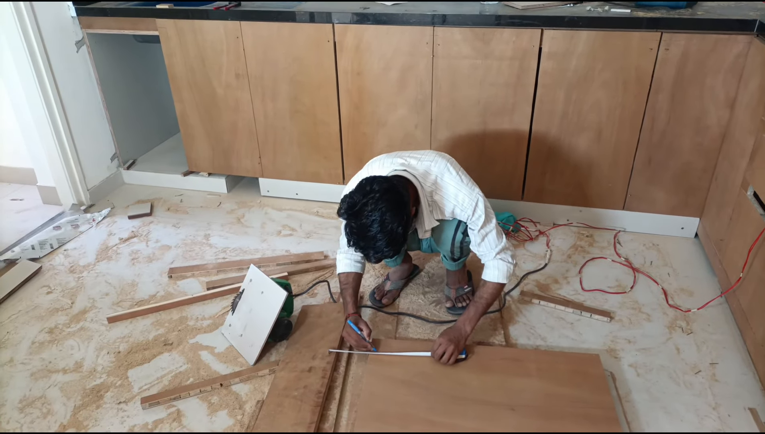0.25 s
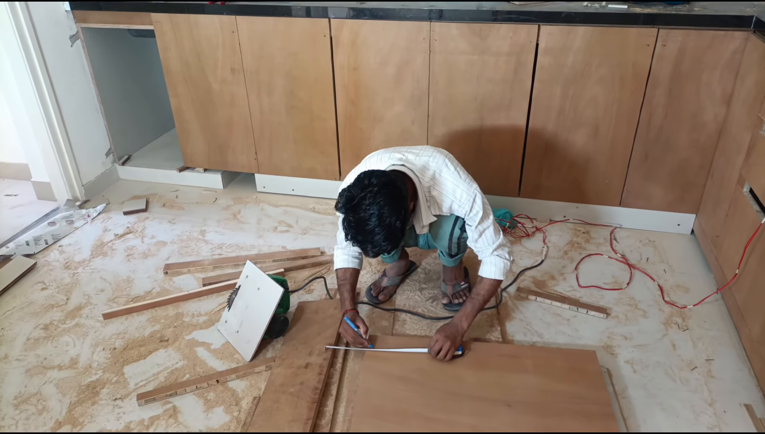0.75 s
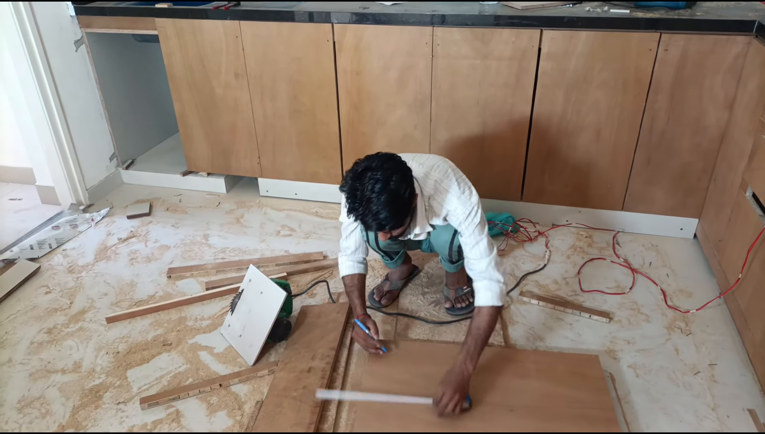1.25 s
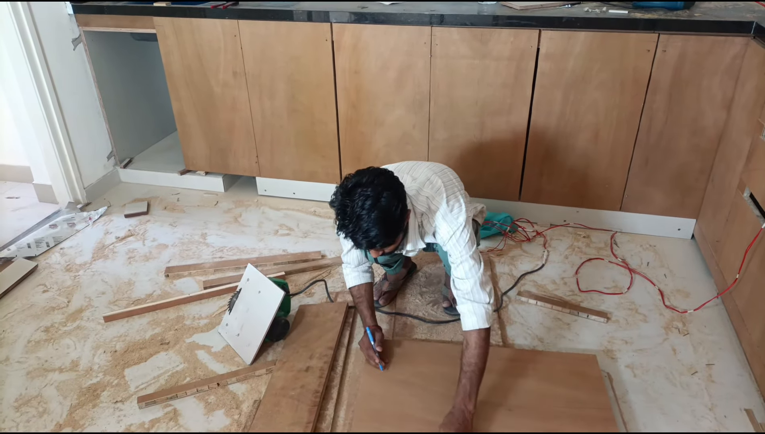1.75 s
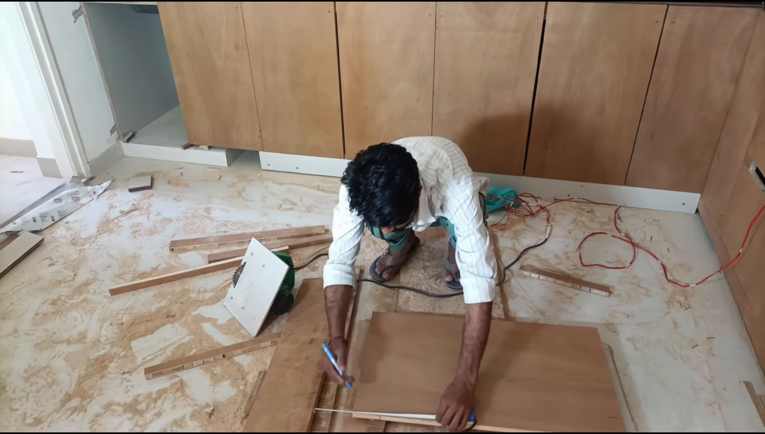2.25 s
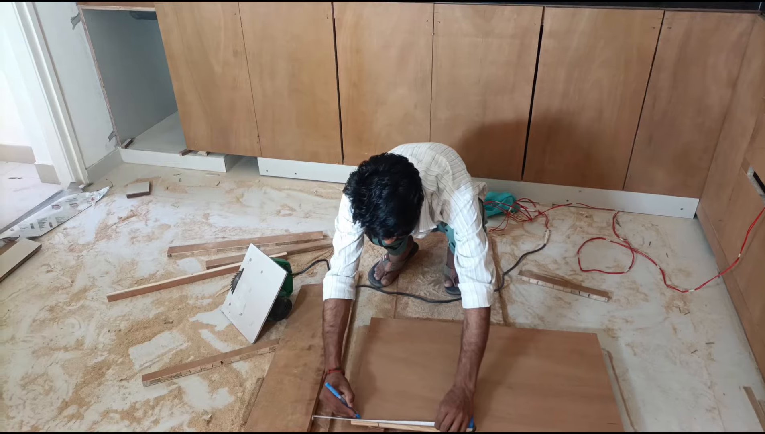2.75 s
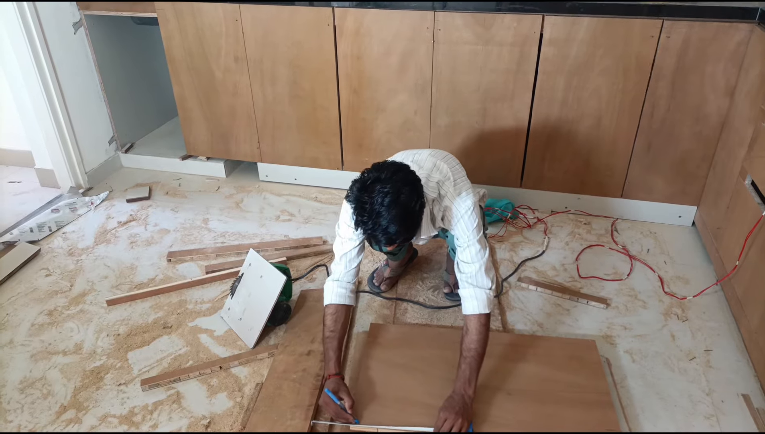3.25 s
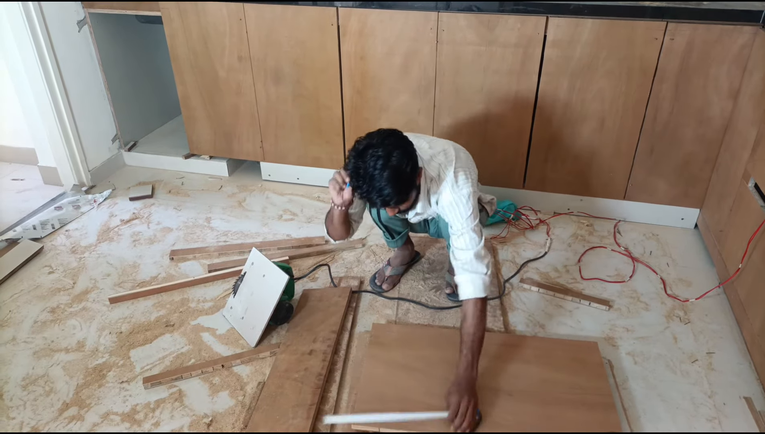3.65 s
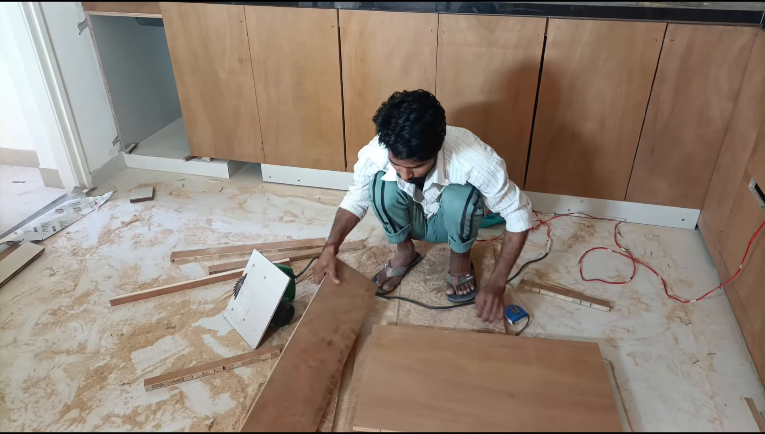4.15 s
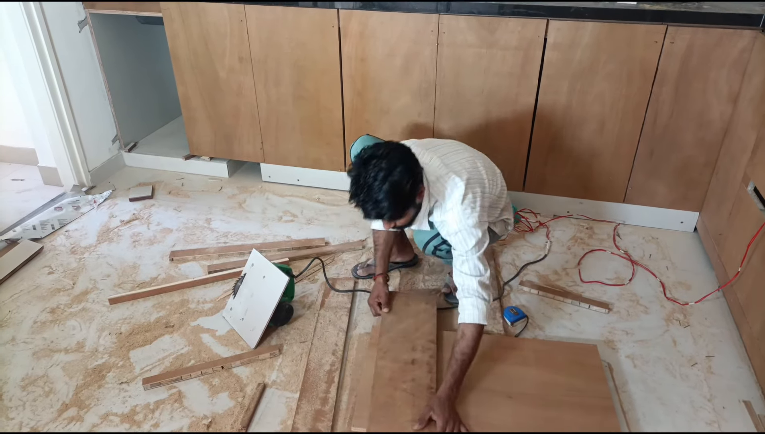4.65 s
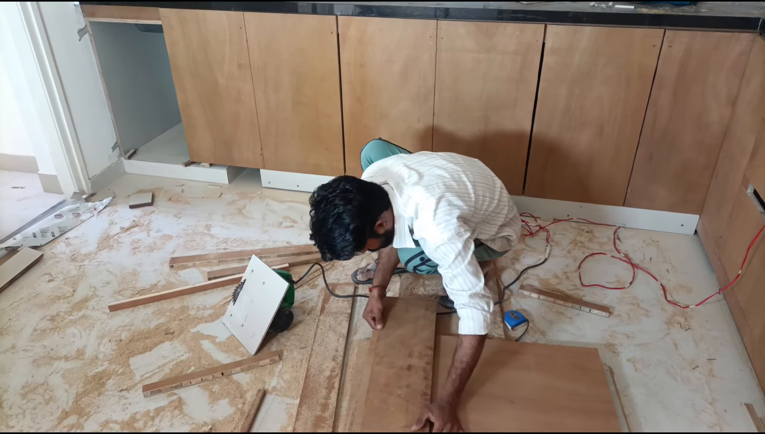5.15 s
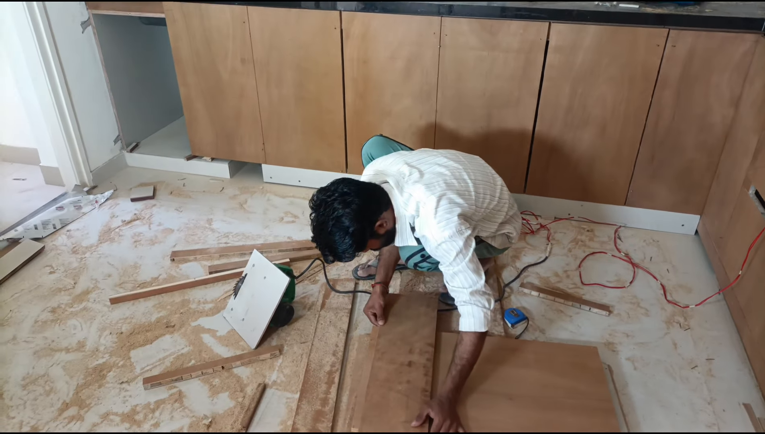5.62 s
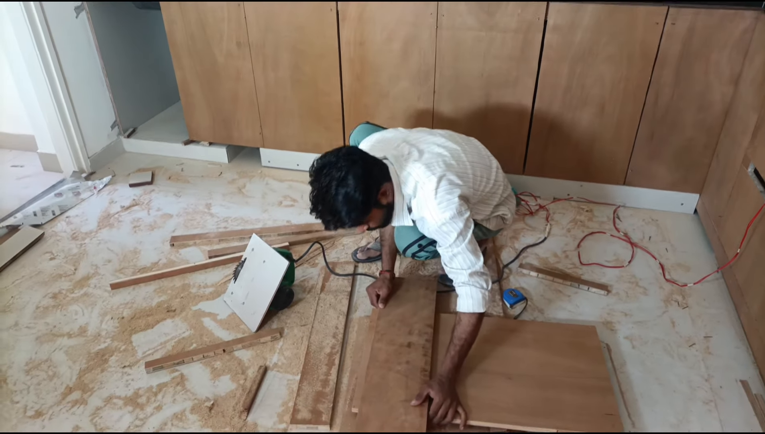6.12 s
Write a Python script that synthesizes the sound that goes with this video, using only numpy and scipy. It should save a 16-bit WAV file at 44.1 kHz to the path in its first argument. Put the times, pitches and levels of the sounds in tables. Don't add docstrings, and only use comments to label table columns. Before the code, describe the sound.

A steel tape measure clacks and slides on a board, snaps sharply, then wooden planks knock and one drops flat in a bare, ringing room.

```python
import sys
import numpy as np
from scipy import signal
from scipy.fft import rfft, irfft
from scipy.io import wavfile
from scipy.ndimage import uniform_filter1d

SR = 44100
rng = np.random.default_rng(int(sys.argv[2]) if len(sys.argv) > 2 else 0)


def voltage_ratio(level):
    return 10 ** (np.asarray(level, float) / 20)


def log_audio(samples):
    frames = np.atleast_2d(samples).T
    limited = np.clip(frames, -1, 1)
    pcm = np.round(limited * 32767).astype(np.int16)
    wavfile.write(sys.argv[1], SR, pcm)


N = 281354

# (f/Hz, level/dB, t60/s)
BLADE = [
    [(2150, -9, .008), (2430, 0, .016), (2700, -1, .011), (3120, -3, .009), (3700, -8, .005),
     (4200, -10, .004)],
    [(410, -4, .025), (510, 0, .03), (1080, -3, .012), (1350, -4, .008), (1700, -5, .008)],
    [(4700, -4, .004), (5400, -3, .004), (6000, 0, .005), (6650, 0, .005), (7200, -6, .004)],
    [(8600, -5, .0009), (9600, -4, .0009), (10500, -1, .0012), (11600, -4, .0009), (12700, -3, .0009),
     (13800, -2, .0009), (14800, -2, .0009)],
]
# (f/Hz, level/dB, t60/s)
PLANK = [
    [(292, -15, .03), (320, -16, .03), (352, -4, .08), (396, -1, .06), (435, 1, .06), (495, -2, .05),
     (590, -7, .025), (690, -8, .02)],
    [(810, -3, .02), (975, -2, .016), (1125, -1, .016), (1335, -4, .011), (1600, -4, .009)],
    [(1850, -1, .01), (2150, -1, .008), (2450, 0, .01), (2750, -4, .007), (3150, -7, .004),
     (3600, -10, .003)],
    [(3600, 0, .004), (4200, -2, .004), (4900, -4, .004), (5700, -6, .004), (6500, -7, .004)],
]
# (f/Hz, likeness 0..1)
AIR_ALIKE = [(60, 0.38), (180, 1), (550, 0.26), (1650, 0.11), (4970, 0.4), (15000, 0.65)]


def evened(x):
    return x / np.sqrt(np.mean(x ** 2) + 1e-20)


def read(points, hz):
    f, value = np.transpose(points)
    return np.interp(np.log(hz + 1), np.log(f + 1), value)


def along(rows):
    s, value = np.transpose(rows)
    return np.interp(np.arange(N) / SR, s, value)


def smooth(x, size):
    return evened(uniform_filter1d(uniform_filter1d(x, size), size))


def resonate(x, hz, width):
    r = np.exp(-np.pi * width / SR)
    return 2 * signal.lfilter([1 - r], [1, -r * np.exp(2j * np.pi * hz / SR)], x).real


def band(lo_hz, hi_hz):
    return signal.butter(2, [lo_hz, min(hi_hz, 20000)], "band", fs=SR, output="sos")


def causal(power):
    fold = irfft(np.log(power + 1e-6 * power.max()) / 2)
    fold[1:len(power) - 1] *= 2
    fold[len(power):] = 0
    return irfft(np.exp(rfft(fold)))


def pair(count, alike, gain_db):
    hz = np.fft.rfftfreq(1024, 1 / SR)[:, None]
    t = np.arange(count // 256 + 5) * 256 / SR
    a, b, c, d = rng.standard_normal((len(t), 513, 4)).T
    same = np.clip(read(alike, hz), -1, 1)
    left = a + 1j * b
    right = same * left + np.sqrt(1 - same ** 2) * (c + 1j * d)
    z = np.array([left, right]) * voltage_ratio(gain_db(hz, t))
    return signal.istft(z, nperseg=1024, noverlap=768)[1][:, :count]


def lean(x, ports):
    half_db = read(ports, np.fft.rfftfreq(x.shape[1], 1 / SR)) / 2
    return irfft(rfft(x) * voltage_ratio(np.array([half_db, -half_db])), x.shape[1])


def contacts(rows, slope, offset_db, length=None):
    events = []
    for s, db, low_db, bright_db, *own in rows:
        top_db = slope * bright_db + offset_db
        events.append((s, db, low_db, bright_db, top_db, (*own, length)[0]))
    return events


def struck(events, body, lead_db, grit_db, spread, rise):
    swing_in_s = 0.00069
    crack_db, skirt_db = -15, -15
    out, t = np.zeros((2, N + SR)), np.arange(12288) / SR
    filters = []
    for modes in body:
        lo, hi = .7 * modes[0][0], 1.25 * modes[-1][0]
        filters.append((band(lo, hi), band(lo / 1.6, hi * 1.5), SR / (2 * (hi - lo))))
    for s, db, *relative_db, length in events:
        length = max(length, .0005)
        clicks = rng.standard_normal(len(t)) * voltage_ratio(grit_db * rng.exponential(1, len(t)))
        clicks *= (1 - np.exp(-t / (rise * length))) * np.exp(-t / length)
        clicks[round(.3 * length * SR)] += voltage_ratio(lead_db)
        clicks = clicks[:round(8 * length * SR)]
        detune = (1 + spread * rng.standard_normal(8)) * (-1) ** np.arange(8)
        power = 0
        for modes, rel_db, (inside, around, size) in zip(body, [0, *relative_db], filters):
            u = t[:round(SR * max(t60 for *_, t60 in modes)) + 256]
            ring = 0
            for (hz, mode_db, t60), k in zip(modes, detune):
                ring = ring + voltage_ratio(mode_db - 60 * u / t60) * np.sin(2 * np.pi * hz * k * u)
            ring *= 1 - np.exp(-u / swing_in_s)
            blow = size * (u == 0)
            ring = signal.sosfilt(inside, ring + voltage_ratio(crack_db) * blow)
            ring += voltage_ratio(skirt_db) * signal.sosfilt(around, blow)
            sound = signal.fftconvolve(clicks, ring)
            sound *= voltage_ratio(db + rel_db) / abs(sound).max()
            out[0, round(s * SR):][:len(sound)] += sound
            power = power + abs(rfft(ring, 16384)) ** 2 * (sound @ sound) / (ring @ ring)
        blend = causal(power)[:8192]
        if length > .007:
            blend = signal.fftconvolve(blend, clicks / np.linalg.norm(clicks))
        out[1, round((s + .001) * SR):][:len(blend)] += blend
    return out[:, :N]


def room(x):
    # (f/Hz, t60/s)
    ring_times = [(100, 0.95), (230, 0.45), (300, 0.45), (355, 0.79), (410, 0.62), (480, 0.56),
                  (1000, 0.61), (2700, 0.54), (6000, 0.52), (9000, .38), (15000, 0.36)]
    # (f/Hz, likeness 0..1)
    tail_alike = [(60, .95), (400, .97), (700, .4), (1300, 0), (5000, 0)]
    gap_s, turns_hz = 0.0024, 11
    t, out = np.arange(SR) / SR, 0
    turn = 2 * np.pi * turns_hz * np.arange(N) / SR
    for share in (np.cos(turn), np.sin(turn)):
        tail = pair(SR, tail_alike, lambda hz, u: -60 * u / read(ring_times, hz))
        tail *= np.clip((t - gap_s) / 0.0021, 0, 1)
        tail *= 1 + 0.68 * np.exp(-t / 0.019)
        out = out + signal.fftconvolve(share * x[None], tail / np.linalg.norm(tail[0]), axes=1)[:, :N]
    return out


def still_air():
    # (f/Hz, level/dB per Hz)
    air_colour = [(15, -22), (25, -6), (165, -10.5), (194, -11), (333, -16.5), (461, -17), (587, -30),
                  (654, -26.5), (812, -25), (955, -23.5), (1430, -30.5), (2660, -31), (7220, -47),
                  (11100, -39.5), (15800, -36.5)]
    return voltage_ratio(-65) * evened(pair(N, AIR_ALIKE, lambda hz, t: read(air_colour, hz)))


def rumble():
    # (t/s, level/dB above rest, fade/s)
    swells = [(1.35, 11.5, 0.33), (1.75, 0, 0.15), (3.58, 10, 0.11), (4.6, 15, .05), (4.7, 18.5, 0.13),
              (5.76, 13.5, 0.08), (6.0, 3.5, 0.34)]
    level_db, wander_db, rise_s = -67.5, -2.5, 0.077

    def colour(hz, u):
        return -24 * np.log10(1 + (hz / 80) ** 2) - 10 * np.log10(1 + (40 / (hz + 1)) ** 2)

    t = np.arange(N) / SR
    drone = evened(pair(N, [(30, 1.0), (200, 0.73)], colour))
    wander = evened(uniform_filter1d(rng.standard_normal(N), 4000))
    swell = 1
    for s, db, fade in swells:
        swell = swell + (voltage_ratio(db) - 1) * np.exp(-((t - s) / np.where(t < s, rise_s, fade)) ** 2)
    return voltage_ratio(level_db + wander_db * wander) * swell * drone


def machine():
    # (t/s, level/dB)
    machine_level = [(0, -73), (.2, -62), (.45, -71), (.8, -77.5), (1.9, -71), (2.3, -67.5), (2.5, -76),
                     (3.2, -78.5), (3.5, -64), (5.0, -64), (5.3, -62.5), (5.9, -61.5), (6.38, -63.5)]
    # (f/Hz, level/dB per Hz)
    hiss_colour = [(290, -38.5), (500, -5.5), (754, -17), (915, -13.5), (2130, -11), (2560, -9.5),
                   (4250, -15), (4680, -15), (6190, -7.5), (9000, -43.5), (11700, -73), (19800, -120)]
    # (f/Hz, width/Hz, level/dB, flutter/dB)
    whines = [(2600, 70, -7, 3), (3860, 35, -11.5, 5), (4500, 35, -11, 4), (4780, 40, -13, 4.5),
              (5250, 60, -20, 5), (6150, 120, -12, 5)]
    mix = evened(pair(N, AIR_ALIKE, lambda hz, t: read(hiss_colour, hz)))
    chirps = smooth(rng.standard_normal(N), 1500)
    for hz, width, db, flutter_db in whines:
        own, drift = (smooth(v, 1200) for v in rng.standard_normal((2, N)))
        turn = np.exp(2j * np.pi * np.cumsum(hz * (1 + .007 * drift)) / SR)
        r = np.exp(-np.pi * width / SR)
        whine = (turn * signal.lfilter([1 - r], [1, -r], rng.standard_normal((2, N)))).real
        flutter = np.clip(.6 * chirps + .8 * own, -2, 1.6)
        mix = mix + voltage_ratio(db + flutter_db * flutter) * evened(whine)
    return voltage_ratio(along(machine_level)) * mix


def backdrop():
    # (f/Hz, level/dB)
    air_ports = [(60, -2), (180, 1.5), (550, -1.5), (1650, 3.5), (4970, 12.5), (15000, 3)]
    return lean(still_air() + machine(), air_ports) + rumble()


def squeak():
    # (f/Hz, width/Hz, level/dB)
    squeak_modes = [(3560, 82, 1), (4000, 140, 1), (5200, 90, -5), (5780, 52, -10), (6330, 51, -25.5)]
    start_s, length_s, level_db = 3.01, .15, -67
    t = np.arange(N) / SR
    shape = np.clip(np.minimum((t - start_s) / 0.0077, (start_s + length_s - t) / 0.049), 0, 1)
    noise = rng.standard_normal(N)
    song = sum(voltage_ratio(m) * evened(resonate(noise, hz, w)) for hz, w, m in squeak_modes)
    return voltage_ratio(level_db) * shape * evened(song)


def floor_thuds():
    # (t/s, level/dB, contact length/s)
    presses = [(1.379, -52, 0.03), (2.184, -67, 0.008), (3.599, -60, 0.025), (4.155, -51, 0.073),
               (4.603, -41.5, 0.02), (4.693, -40, 0.0034), (5.545, -46, 0.018), (5.581, -50.5, 0.013),
               (5.625, -52, 0.016), (5.707, -59, 0.012), (6.327, -55.5, 0.024)]
    # (f/Hz, level/dB, t60/s)
    floorboard = [
        [(132, -11.5, 0.1), (213, -5, 0.26), (258, 4.5, 0.085), (363, -1.5, 0.15)],
    ]
    return struck(presses, floorboard, lead_db=-30, grit_db=1.5, spread=.04, rise=.6)


def pen_squeaks():
    # (t/s, level/dB, contact length/s)
    strokes = [
        (.045, -53, 0.0087),
        (.216, -49, .006),
        (.575, -66, .005),
    ]
    # (f/Hz, level/dB, t60/s)
    nib = [
        [(5770, 1, 0.011), (6080, 12, 0.014), (6200, -11, 0.009)],
    ]
    return struck(strokes, nib, lead_db=-10, grit_db=1.5, spread=.01, rise=.5)


def hook_taps():
    # (t/s, ring level/dB, low thud/dB rel, brightness/dB rel)
    tap_rows = [(0.839, -47.5, -3.5, -9), (0.8965, -50.5, -9, -30), (0.9445, -34.5, -12.5, -33),
                (0.9495, -47, -36, 9.5), (1.0294, -60.5, 10, -31), (1.0402, -38, -12.5, 3.5),
                (1.084, -52, 1.5, -31), (2.2, -58.5, -5.5, 11), (2.5294, -67.5, -4, -14),
                (3.2824, -70, 7.5, -4.5), (3.3731, -55, -3, -18), (3.455, -46.5, -9, -20),
                (3.4664, -54.5, 0, -20)]
    # (f/Hz, level/dB, t60/s)
    hook = [
        [(1716, -5.5, 0.027), (1910, -5.5, 0.02), (2406, 0, 0.017), (2820, -8.5, 0.0065), (3170, -10.5, 0.013)],
        [(400, -1.5, 0.037), (499, 2, 0.049), (1056, -6.5, 0.064), (1240, -5.5, 0.09)],
        [(5300, -14, 0.0043), (5975, 0, 0.0077), (6400, -1, 0.0077), (6650, 2.5, 0.012), (7080, -8, 0.0055)],
        BLADE[-1],
    ]
    events = contacts(tap_rows, slope=0.42, offset_db=-6, length=0.0017)
    return struck(events, hook, lead_db=5, grit_db=2.0, spread=0.012, rise=0.5)


def blade_slides():
    # (t/s, blade ring/dB, panel thud/dB rel, brightness/dB rel, stroke length/s)
    slide_rows = [(0.0464, -79, 13, -3, 0.02), (0.2082, -69, 16.5, -3, 0.0077),
                  (0.5764, -64.5, -17.5, -3, 0.043), (1.177, -44, -24, 5.5, 0.017),
                  (1.21, -38, -2.5, 1.5, 0.016), (1.24, -51.5, -16.5, -13, 0.011), (3.43, -50, 4, 1, 0.012),
                  (3.565, -46, -51, -2.5, 0.049), (3.6985, -34.5, -10.5, -6.5, 0.011),
                  (3.853, -44.5, -35.5, 7.5, 0.021), (3.908, -26.5, -37.5, 6, 0.0078),
                  (3.928, -40.5, -39.5, 4, 0.13), (3.942, -33, -32.5, 5.5, 0.012),
                  (4.3782, -34.5, -12.5, -1.5, 0.014), (4.5093, -42.5, -4.5, 3.5, 0.0095),
                  (4.5399, -38, -5.5, 2, 0.026), (4.79, -55, -19, 6, 0.04), (6.3507, -62, 14, 5.5, 0.045)]
    # (f/Hz, level/dB, t60/s)
    rubbed = [
        [(2100, -9.5, 0.0031), (2260, 0, 0.006), (2980, -0.5, 0.0025), (3550, -13, 0.017),
         (3997, -10.5, 0.0083)],
        [(385, -3.5, 0.037), (480, -1.5, 0.02), (1050, -2, 0.03), (1300, 10, 0.0056), (1720, -5.5, 0.004)],
        *BLADE[-2:],
    ]
    events = contacts(slide_rows, slope=3.9, offset_db=-9.5)
    return struck(events, rubbed, lead_db=-30.0, grit_db=3.5, spread=0.037, rise=0.8)


def blade_clacks():
    # (t/s, blade ring/dB, panel thud/dB rel, brightness/dB rel)
    clack_rows = [(1.182, -47.5, -25, 11.5), (1.3405, -48, -31.5, 16.5), (1.6015, -30, -3.5, 10.5),
                  (1.608, -35.5, -5.5, 12), (3.663, -45.5, -34, 15), (3.6805, -36, -12.5, 16),
                  (3.7952, -36.5, -1, 12), (3.8714, -48.5, -4.5, 4), (3.925, -18, -38, 6),
                  (3.947, -38.5, -19, -6), (4.039, -11.5, -29.5, 2), (4.045, -32, -18, -15),
                  (4.1598, -5.5, -31.5, -4.5), (4.1712, -18, -15, -12.5), (4.181, -18, -15.5, -12.5),
                  (4.617, -25.5, 13.5, 0.5)]
    events = contacts(clack_rows, slope=1.23, offset_db=-0.57, length=0.0041)
    return struck(events, BLADE, lead_db=10, grit_db=2.0, spread=0.022, rise=0.81)


def case_snaps():
    # (t/s, ring level/dB, low thud/dB rel, brightness/dB rel)
    snap_rows = [
        (1.4285, -3.5, -8, -9.5),
        (1.4495, -11.5, -6.5, -11),
        (1.462, -30.5, 3.5, -11.5),
        (1.476, -38.5, 6.5, -24),
    ]
    # (f/Hz, level/dB, t60/s)
    case = [
        [(1800, -7.5, 0.011), (2350, -5, 0.016), (3050, -7.5, 0.005), (3274, -9.5, 0.0087),
         (3710, -10.5, 0.0083), (4000, -12, 0.00297)],
        [(385, -20.5, 0.018), (435, 9.5, 0.036), (861, 1, 0.022), (1130, 20.5, 0.025), (1350, -10, 0.0074)],
        [(4360, 1.5, .003), (5000, -4.5, 0.0049), (5900, -3, 0.0028), (6410, -0.5, 0.0087),
         (7000, -9.5, 0.0053)],
        BLADE[-1],
    ]
    events = contacts(snap_rows, slope=1, offset_db=0.94, length=0.0036)
    return struck(events, case, lead_db=10, grit_db=0.5, spread=.005, rise=0.5)


def board_knocks():
    # (t/s, boom/dB, knock/dB rel, brightness/dB rel)
    knock_rows = [(0.147, -53, -9, -2), (0.236, -45.5, -27, -13), (0.732, -61.5, -16.5, -2),
                  (1.254, -54.5, -3.5, 15.5), (3.457, -67, 2, -19), (3.665, -59, 13, 24.5),
                  (3.715, -57, 18, 26), (3.761, -51, 9.5, 18), (3.808, -45.5, 5, -7),
                  (3.976, -41.5, -7.5, 6), (4.105, -25, 7.5, 7), (4.117, -29.5, 0, 1.5),
                  (4.145, -28, 13, 6.5), (4.157, -19, 1.5, 11.5), (4.176, -45, 6, 14), (5.890, -55, 9, 1),
                  (5.897, -42, -7, -12), (5.921, -39, -34, -8), (6.283, -72, -22, -15)]
    # (f/Hz, level/dB, t60/s)
    strip = [
        [(423, -11, 0.012), (440, -4, 0.03), (513, 1, 0.031), (634, -5.5, 0.0088)],
        *PLANK[-3:],
    ]
    events = contacts(knock_rows, slope=0.93, offset_db=-0.39, length=0.0053)
    return struck(events, strip, lead_db=7.0, grit_db=-2.0, spread=0.0056, rise=0.7)


def board_drop():
    # (t/s, boom/dB, knock/dB rel, brightness/dB rel)
    slap_rows = [(4.605, -5, -3, -6), (4.612, -12.5, 1.5, 1), (4.618, -12, 5, 8.5), (4.624, -12, 1.5, -7.5),
                 (4.640, -16.5, 1.5, -9.5), (4.654, -7, -6, -12.5), (4.679, -11, -3, -7),
                 (4.6815, -14.5, 6, 3), (4.690, -15.5, 4.5, 9), (4.697, -10.5, 3.5, -10),
                 (4.709, -27, -5, -9), (4.749, -35, -2.5, -36)]
    events = contacts(slap_rows, slope=0.8, offset_db=-20, length=0.0033)
    return struck(events, PLANK, lead_db=13.5, grit_db=2.5, spread=0.03, rise=0.43)


def scene():
    # (f/Hz, level/dB)
    near_ports = [(60, -8), (130, 0.5), (290, 1), (640, -1.5), (1410, 1.5), (3100, 8), (6500, 11),
                  (9000, -6), (12500, 9.5), (15000, 16)]
    rub, thuds, pen = squeak(), floor_thuds(), pen_squeaks()
    taps, slides, clacks, snaps = hook_taps(), blade_slides(), blade_clacks(), case_snaps()
    wood_top = signal.butter(6, 6800, fs=SR, output="sos")
    board = signal.sosfilt(wood_top, board_knocks() + board_drop())

    aside = voltage_ratio(8.5) * taps[0] + voltage_ratio(-5.0) * clacks[0] + voltage_ratio(-5.0) * snaps[0] + voltage_ratio(-6.0) * slides[0]
    aside = aside + pen[0] + rub
    late = np.roll(aside, 17)
    ahead = voltage_ratio(-4.5) * board[0] + thuds[0]
    to_walls = voltage_ratio(6.5) * taps[1] + clacks[1] + voltage_ratio(-4.0) * snaps[1] + voltage_ratio(3.5) * slides[1]
    to_walls = to_walls + voltage_ratio(-1.0) * board[1] + voltage_ratio(1.0) * thuds[1] + voltage_ratio(3.0) * pen[1] + rub
    near = np.array([late, aside]) + ahead + room(to_walls)
    return lean(near, near_ports) + backdrop()


def roll_off(x):
    return signal.sosfilt(signal.butter(12, 16470, fs=SR, output="sos"), x)


def record(dry):
    # (f/Hz, level/dB)
    mic_colour = [(3000, -0.5), (6800, -6), (7700, -3), (9500, -0.5), (12500, 1.5), (15500, -4.5)]
    coloured = irfft(rfft(dry) * voltage_ratio(read(mic_colour, np.fft.rfftfreq(N, 1 / SR))), N)
    rounded = np.tanh(coloured / 1.328) * 1.26
    top_cut = signal.firwin(511, 15750, window=("kaiser", 9), fs=SR)
    mix = signal.oaconvolve(rounded, top_cut[None], "same")
    return roll_off(mix)


dry = scene()
out = record(dry)
log_audio(out)
```